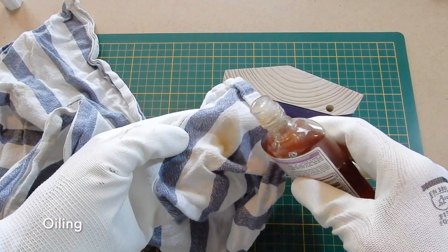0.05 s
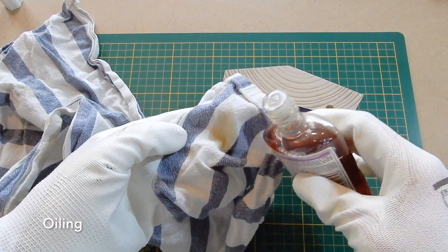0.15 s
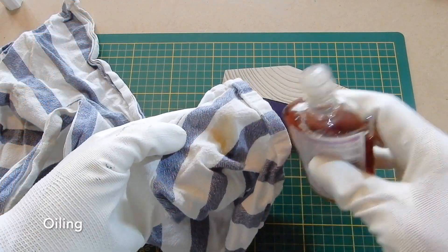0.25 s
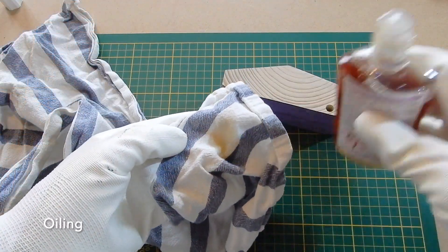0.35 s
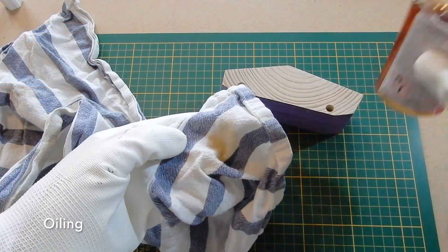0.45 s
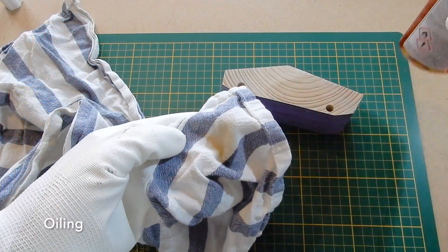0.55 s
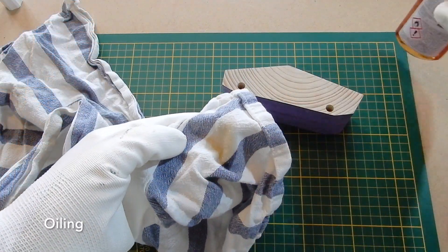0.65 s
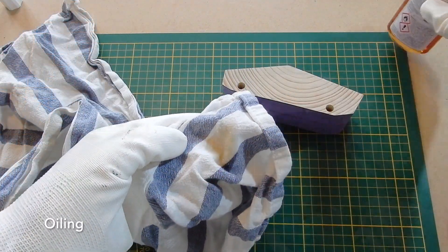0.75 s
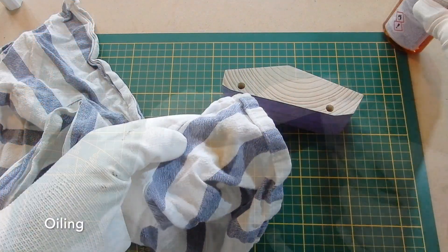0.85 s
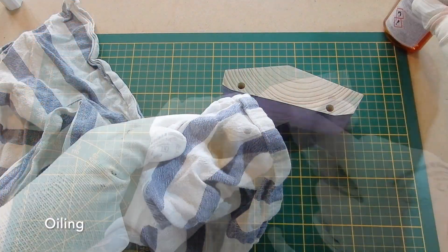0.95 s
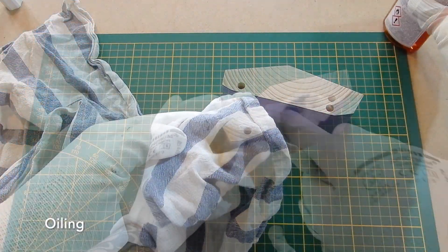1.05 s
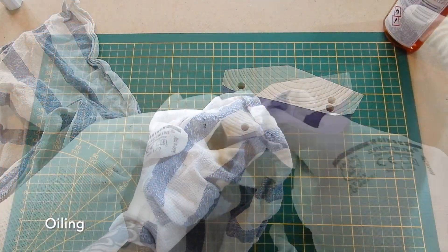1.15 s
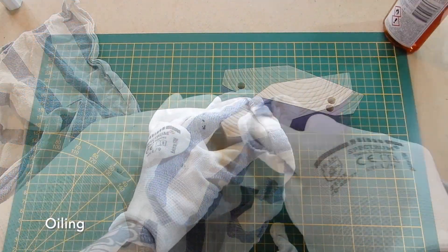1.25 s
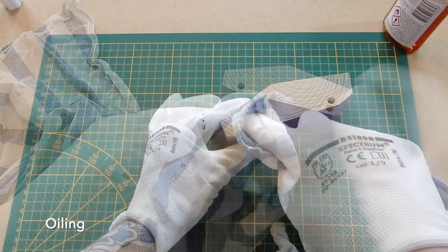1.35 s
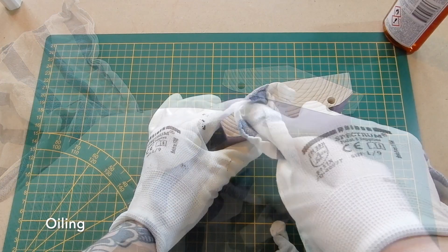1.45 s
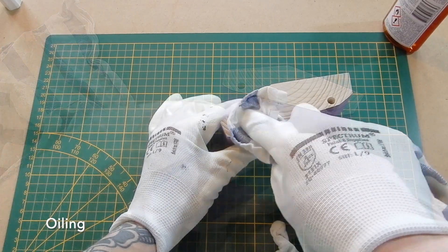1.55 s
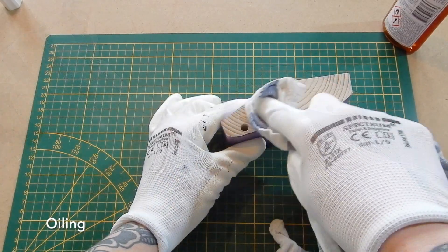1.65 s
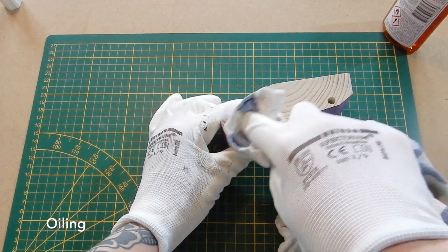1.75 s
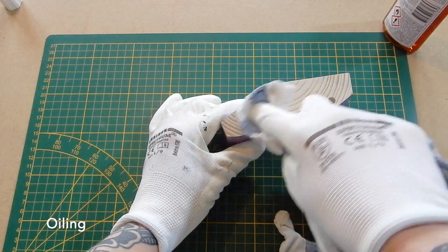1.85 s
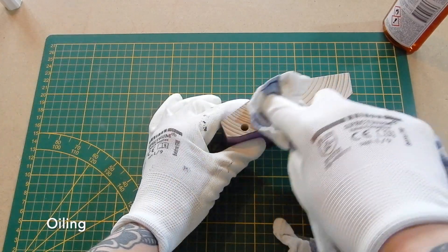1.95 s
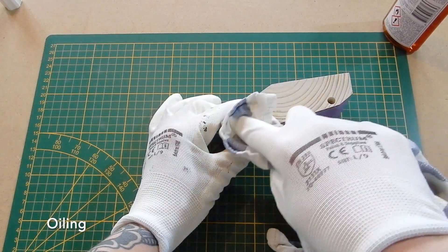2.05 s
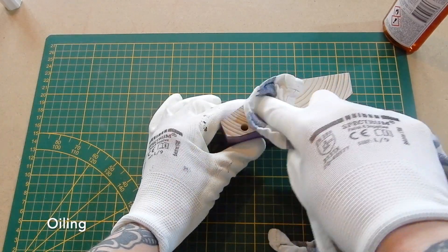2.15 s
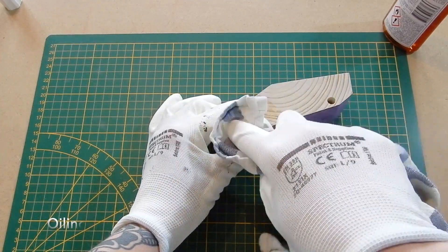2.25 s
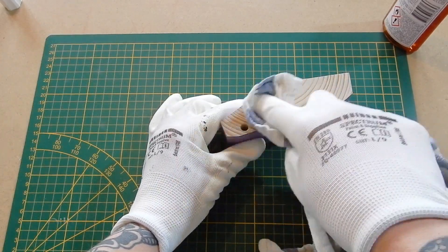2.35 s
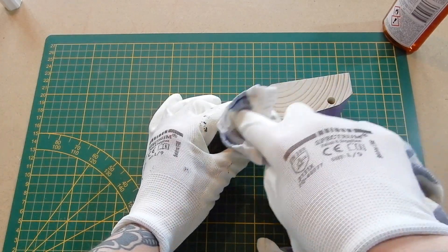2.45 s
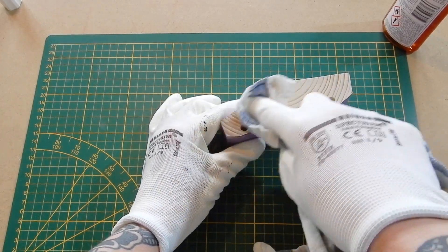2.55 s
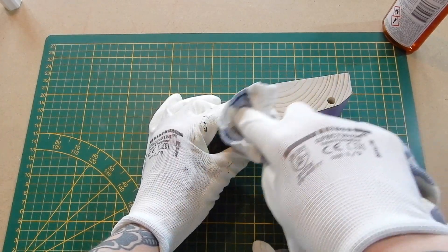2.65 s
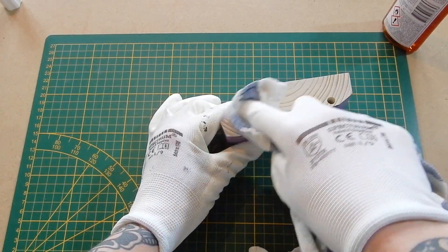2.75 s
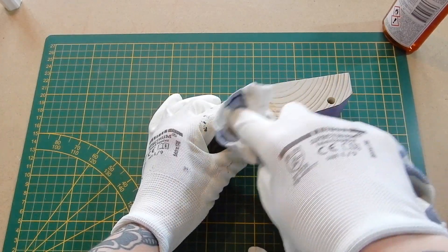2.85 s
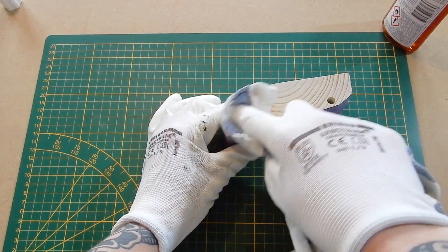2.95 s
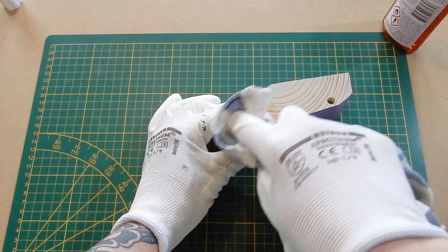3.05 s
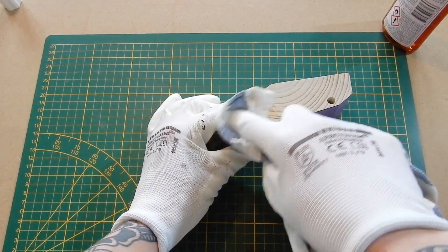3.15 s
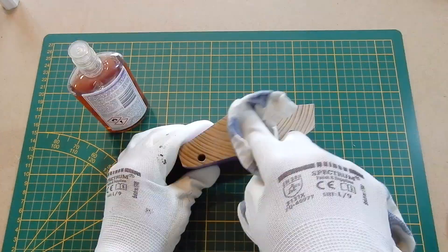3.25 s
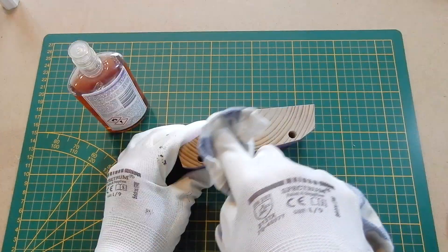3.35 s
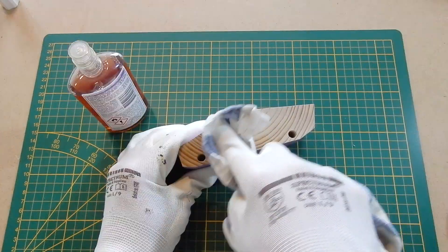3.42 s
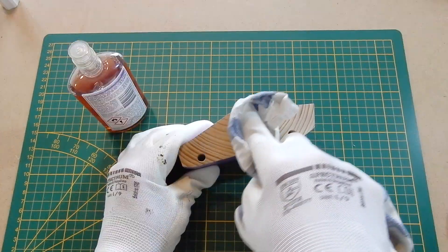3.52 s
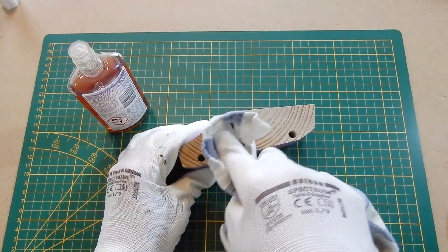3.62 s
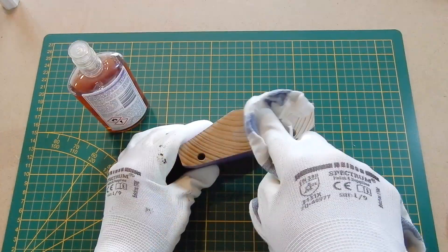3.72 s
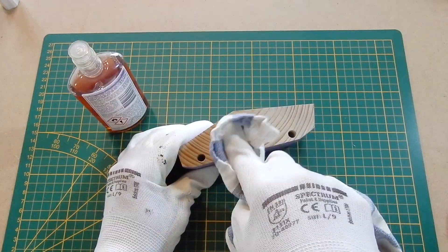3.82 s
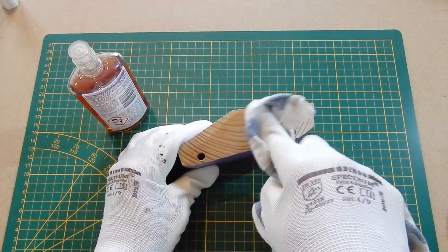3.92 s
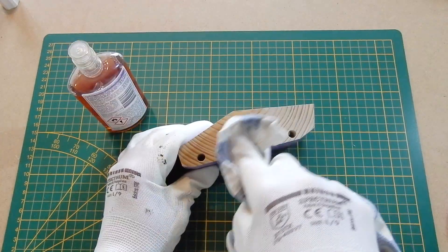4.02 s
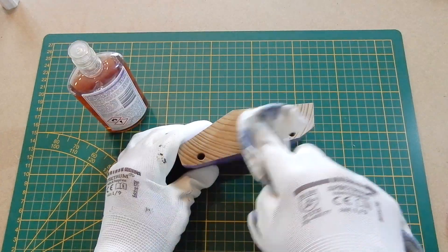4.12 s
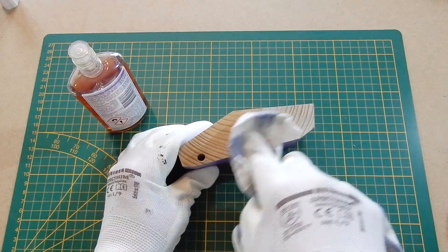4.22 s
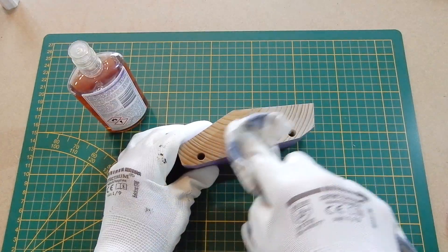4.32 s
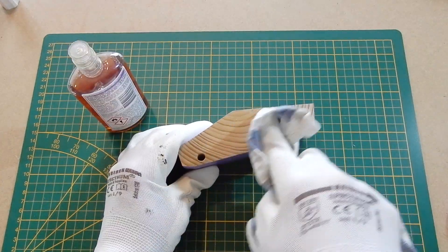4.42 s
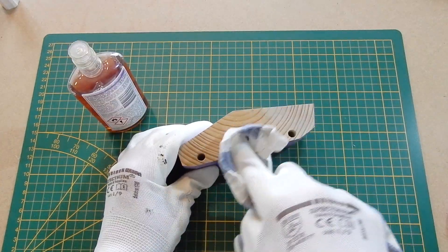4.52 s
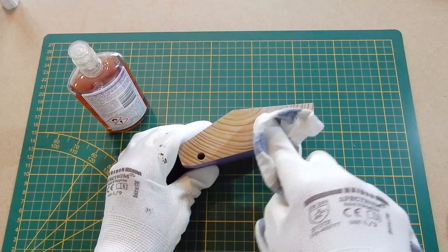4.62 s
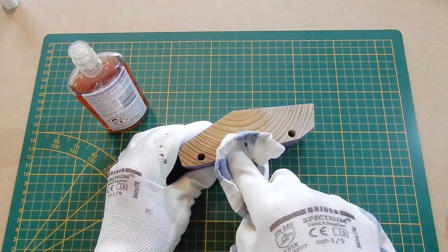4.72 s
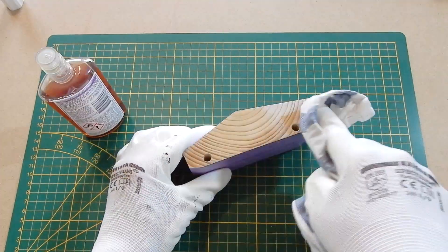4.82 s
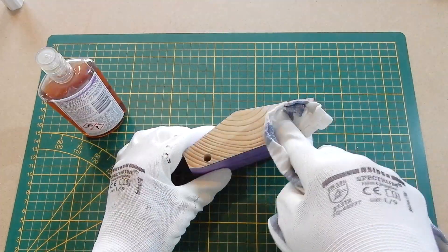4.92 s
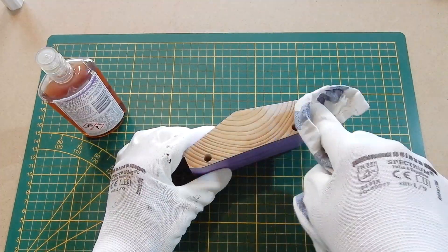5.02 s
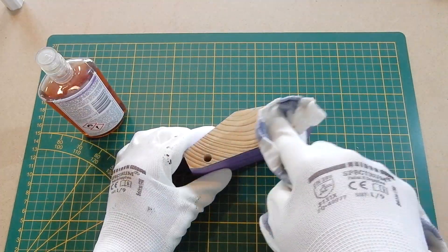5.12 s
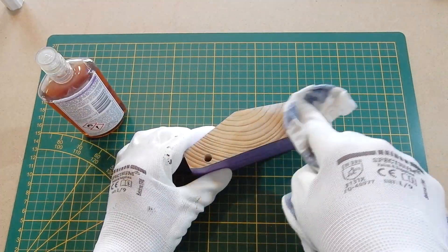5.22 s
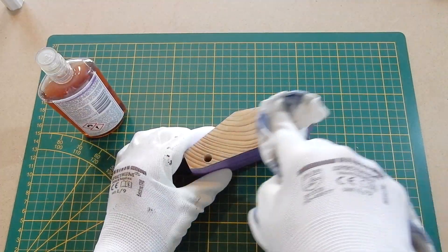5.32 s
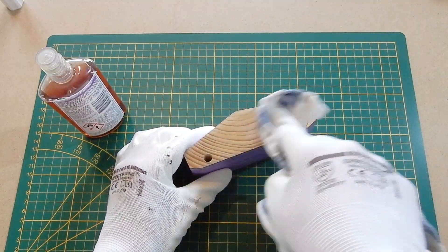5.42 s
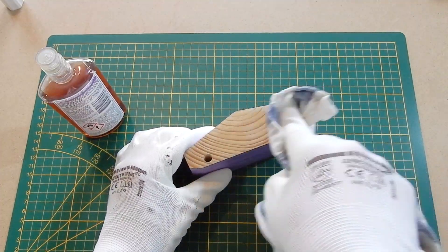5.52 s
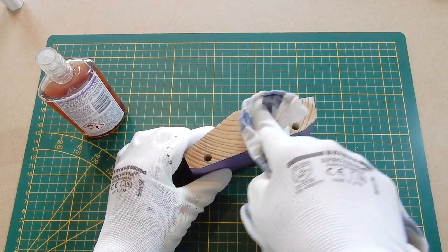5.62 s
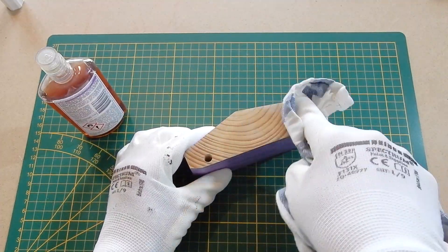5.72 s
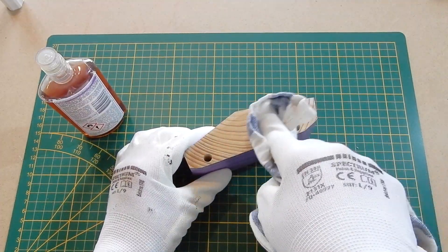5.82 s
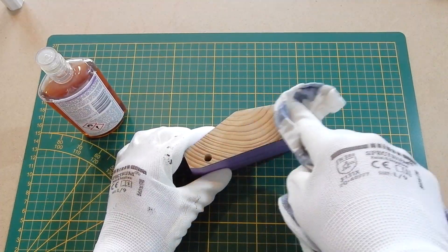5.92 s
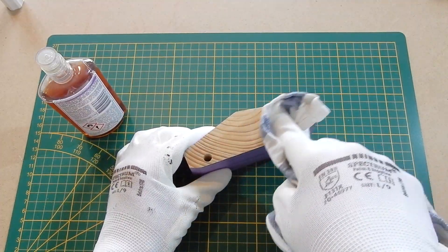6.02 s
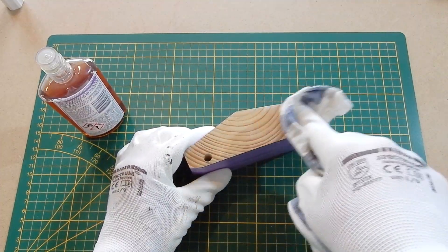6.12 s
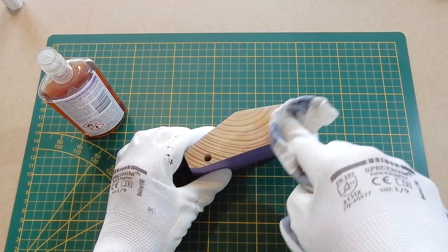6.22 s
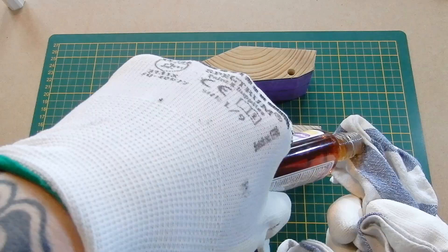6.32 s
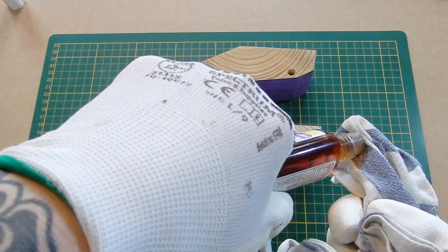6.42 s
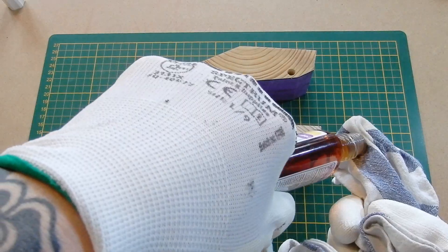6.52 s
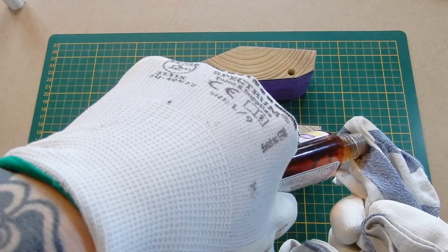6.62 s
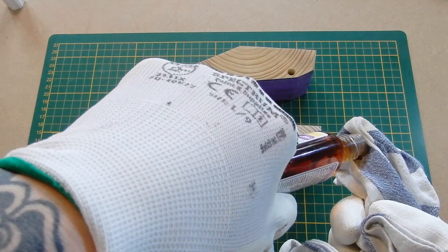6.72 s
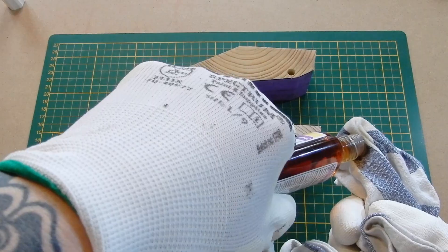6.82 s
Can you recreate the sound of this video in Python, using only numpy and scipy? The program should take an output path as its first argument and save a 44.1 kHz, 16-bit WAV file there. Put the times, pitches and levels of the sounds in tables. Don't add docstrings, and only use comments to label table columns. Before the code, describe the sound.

In a small room with a faint fan, soft glove rustling, one ringing bottle knock on a table, then rapid raspy cloth rubbing on wood.

```python
import sys
import numpy as np
from scipy import signal
from scipy.fft import rfft, irfft, next_fast_len
from scipy.io import wavfile
from scipy.ndimage import uniform_filter1d

SR = 44100
rng = np.random.default_rng(int(sys.argv[2]) if len(sys.argv) > 2 else 0)


def wav_out(sig):
    wavfile.write(sys.argv[1], SR, np.round(np.clip(np.atleast_2d(sig).T, -1, 1) * 32767).astype(np.int16))


def boost(x):
    u = np.asarray(x, float) / 20
    return 10 ** u


N = 303021
STEP = 64

# frequency in Hz, t60 in seconds.
ROOM_DECAY = [(100, 0.52), (1000, 1), (4000, 0.37), (8000, 0.25), (11000, 0.25), (15000, 0.37)]

# frequency in Hz, level in dB per Hz.
FAN_COLOUR = [(15, -48), (25, -13.5), (107, -7.5), (189, -5), (333, -10.5), (448, -9), (672, -15.5),
              (1200, -20.5), (1590, -19.5), (2200, -24), (4800, -26), (5400, -31.5), (9000, -40),
              (13700, -43), (14300, -57), (15500, -70)]
# centre in Hz, width in Hz, height in dB.
FAN_HUMPS = [(458, 25, 3), (1040, 60, 8), (1385, 55, 8), (1990, 55, 8), (2360, 57, 6), (2860, 65, 9),
             (3670, 76, 6), (4280, 100, 4), (4820, 110, 5), (5950, 90, 13)]
# frequency in Hz, likeness from 0 to 1.
FAN_LIKENESS = [(60, 0.6), (300, 0.55), (640, 0.18), (1400, 0.55), (3000, 0.38), (7000, 0.17),
                (15000, 0.053)]

# time in seconds, level in dB.
LEAN = [(0.0, -68.5), (0.3, -67.5), (0.9, -65), (1.3, -71), (1.68, -73), (1.9, -62.5), (2.4, -60.5),
        (3.1, -59), (3.7, -58.5), (4.4, -59), (5.2, -58), (5.9, -62), (6.37, -62.5), (6.45, -70),
        (6.87, -67.5)]
# peak in seconds, low part in dB, sharper part in dB.
SHOVES = [(0.076, -70, -72), (0.356, -69, -78), (0.532, -68, -69), (0.804, -75, -59), (0.92, -72, -85),
          (1.77, -75, -60), (2.14, -57, -77.5), (2.82, -59, -75), (3.2, -56, -62), (3.235, -55, -54),
          (4.02, -57, -68.5), (4.72, -71, -57), (5.24, -66, -57.5), (5.66, -62, -75), (5.82, -65, -79),
          (6.01, -56, -70), (6.38, -62, -75)]
# centre in Hz, width in Hz, level in dB.
BOARD = [(95, 35, -5.5), (142, 53, -3), (287, 122, -2), (420, 190, -16), (640, 250, -20)]
TABLE_SHELF = (108.74, 720)

# peak in seconds, rise in seconds, fall in seconds, level in dB,
# brightness in dB per octave.
SLIDES = [(0.0, .05, 0.056, -52.5, -4), (0.13, 0.1, .07, -59.5, 0), (.15, .2, .2, -64.5, 3),
          (0.235, 0.06, 0.023, -55.5, 1.5), (0.32, 0.1, 0.025, -62, -0.5), (0.42, 0.1172, 0.062, -70.5, 2),
          (0.57, 0.083, 0.1, -59.5, -2), (0.765, 0.093, 0.095, -61.5, -1.5), (1.1, 0.3348, 0.11, -68, 4),
          (1.255, 0.087, 0.041, -63.5, 2), (1.37, 0.1467, 0.11, -72.5, 6), (1.48, 0.035, 0.1034, -72, 2),
          (1.635, 0.021, 0.046, -69.5, 3), (1.742, 0.01306, 0.0166, -59, 1), (6.55, .015, .03, -79, 5),
          (6.675, .015, .03, -79, 4), (6.8, .015, 0.027, -79, 0)]
# frequency in Hz, level in dB per Hz.
FABRIC = [(880, -10), (1500, -7.5), (1690, -15), (1930, -3.5), (2520, -1), (4060, -1.5), (5340, -2.5),
          (9700, -10), (13000, -21), (15500, -24)]
# peak in seconds, half length in seconds, level in dB,
# centre in Hz.
SWISHES = [
    (.005, 0.053, -56.5, 2460),
    (0.185, .005, -54.5, 2900),
    (0.225, 0.027, -60, 5000),
    (0.333, 0.014, -66, 4800),
    (.58, 0.0412, -62, 6170),
    (1.24, 0.028, -68, 2980),
]
# time in seconds, level in dB.
TICKS = [
    (0.187, -58),
    (3.173, -40),
    (6.438, -60),
    (6.4612, -55),
    (6.5236, -70),
    (6.549, -64),
    (6.6757, -61),
    (6.8004, -62),
]
# start in seconds, level in dB, bubble pitch in Hz.
GLUGS = [
    (0.71, -41.5, 280),
    (0.74, -45.5, 262),
    (0.808, -46, 304),
    (0.83, -47, 220),
    (0.854, -43.5, 370),
]

# time in seconds, blow on the table in dB, ring of the bottle in dB.
CONTACTS = [(0.9415, -18.5, -53), (0.9484, -28, -49.5), (0.96, -29.5, -48), (.968, -25.5, -56),
            (0.973, -30, -48), (.9842, -31.5, -49.5), (.993, -31, -55.5), (1.004, -56, -55),
            (1.021, -34, -61), (1.039, -37, -66), (1.052, -54, -67), (1.077, -46, -76), (1.0881, -46, -72)]
# frequency in Hz, level in dB, t60 in seconds.
TABLE_MODES = [(98.21, -10, 0.174), (131, -1, 0.12), (160, -15, 0.24), (194, -11, 0.057), (275, -8.5, 0.15),
               (306.4, -1, 0.26), (330, -13, 0.13), (405, -16, 0.21), (458, -14, 0.16), (506, -13, 0.081),
               (555, -21, 0.14), (608, -17, 0.14), (674, -24, 0.21), (772, -17, 0.22), (859.88, -30, 0.18),
               (920, -24, 0.16), (945, -23, 0.15), (1050, -22, 0.13), (1160, -20, .2)]
# frequency in Hz, level in dB, t60 in seconds.
BOTTLE_MODES = [(2050, -5, 0.049), (2720, -14, 0.023), (3460, -13, 0.095), (3580, -3, 0.07),
                (3670, -5, 0.094), (3709, -9, 0.13), (3759.3, -20, 0.06), (4100, -16, 0.049),
                (4710, -3, 0.11), (5518, -17, 0.093), (6030, -3, 0.036), (7400, -7, 0.05),
                (8200, -11, 0.11), (8500, -12, 0.1)]
# frequency in Hz, level in dB.
THUD_COLOUR = [(60, -17), (130, 2), (200, -5), (300, 0), (500, 4), (800, -10), (1200, -7.5), (1500, -34),
               (2500, -24), (4000, -32)]
# time in seconds, level in dB, centre in Hz, t60 in seconds.
RIM_CRACKS = [
    (0.9428, -37.5, 3330, .02),
    (.9458, -38.5, 2080, 0.046),
]
# frequency in Hz, level in dB, t60 in seconds.
FRAME_MODE = (85, -33.5, 0.23)

# end in seconds, stroke rise in seconds, stroke fall in seconds, roundness in dB,
# room level in dB, share of the rise before the start.
BOUTS = [
    (3.338, 0.029, 0.021, 7, -7, .6),
    (4.873, .014, 0.015, 2.5, -10, 0.47),
    (6.402, .015, .018, 4.5, -12, 0.5),
]
# frequency in Hz, level in dB per Hz.
RUB_COLOURS = [
    [(530, -19), (900, -18), (1310, -20), (1420, -9.5), (1620, -15), (2320, -4), (4030, -3), (5770, -1.5),
     (9210, -7), (14300, -20), (15800, -21)],
    [(530, -22.5), (900, -24), (1580, -29), (1870, -16.5), (2380, -13), (2580, -8.5), (3880, -4),
     (4490, -0.5), (6500, 0.5), (14900, -10), (15800, -18)],
    [(530, -40), (900, -21), (1620, -28), (1990, -19), (3360, -12), (4330, -6.5), (8070, -2.5),
     (9320, -3.5), (11000, -11.5), (15100, -19.5), (15800, -18)],
]
# start in seconds, length in seconds, level in dB,
# hollow of the block in dB.
FIRST_STROKES = [(1.753, 0.064, -43.5, -1.5), (1.86, 0.071, -43, -8.5), (1.978, 0.075, -44.5, -6.5),
                 (2.097, 0.079, -42, -14), (2.231, 0.051, -43.5, -6), (2.331, 0.062, -44, -12),
                 (2.441, 0.067, -44, 3), (2.552, 0.058, -46, -9), (2.666, 0.052, -46, 1.5),
                 (2.762, 0.056, -47, -7), (2.878, 0.049, -47.5, 3.5), (2.968, 0.065, -48.5, -2.5),
                 (3.079, 0.054, -46.5, 3), (3.17, 0.075, -50.5, 2), (3.278, 0.048, -49.5, 6)]
# start in seconds, length in seconds, level in dB, hollow in dB.
SECOND_STROKES = [(3.355, 0.052, -46.5, 9.5), (3.451, 0.069, -47.5, 13.5), (3.569, 0.065, -46, 9),
                  (3.683, 0.069, -46, 8), (3.797, 0.073, -44, 6.5), (3.91, 0.06, -41, 3.5),
                  (4.021, 0.05, -41, 1.5), (4.122, 0.077, -41.5, 2), (4.236, 0.056, -40.5, 2),
                  (4.345, .07, -41, -1), (4.456, 0.064, -39, -1), (4.567, 0.073, -39.5, 0.5),
                  (4.685, 0.062, -39.5, -4), (4.795, 0.074, -41, 0)]
# start in seconds, length in seconds, level in dB, hollow in dB.
THIRD_STROKES = [(4.894, 0.062, -41.5, 7), (4.989, 0.08, -38.5, 2), (5.106, 0.056, -39, 2.5),
                 (5.205, 0.075, -38, -0.5), (5.321, 0.06, -40, 2), (5.43, 0.08, -38.5, 2.5),
                 (5.551, 0.064, -42, 2), (5.664, 0.071, -40, 2), (5.787, 0.08, -43.5, -2.5),
                 (5.903, 0.078, -42.5, 3), (6.026, 0.05, -41.5, -1), (6.131, 0.053, -45, 8.5),
                 (6.233, 0.053, -43, 5), (6.324, 0.065, -44.5, 4)]
# swell over the stroke in dB,
# brightness in dB per octave.
DIRECTIONS = [
    [(-0.5, 0), (0, 1.14)],
    [(-7, 1), (-6, -0.5)],
    [(-8, -0.1), (-7, 1)],
]
PRESSURE_TILT = [-0.051, -0.36, -0.079]
# level in dB, brightness in dB per octave.
DRAGS = [
    (-61.5, -4),
    (-63, -7.5),
    (-60.5, -8),
]
# brightness in dB per octave,
# fine fizz in dB, low skirt in dB.
STROKE_QUIRKS = [
    [(-1.7, 0.5, -2), (0, -0.5, -1), (0.5, 0.9, 0.5), (1.5, -6, 0.5), (-1, 0, 0.5), (-1.3, 1, 4),
     (1.9, 2.5, 2.5), (-0.3, -1, 2.1), (0.5, 1, 1), (0.8, 2, 5), (-0.7, 8, 1), (0.7, 6, 7), (-1.5, 7, 0.5),
     (-0.5, 6, -2.0), (2.5, 6, 7)],
    [(2.5, -5, 5), (5.2, -4.5, 9), (2, -1, 7), (3, -5, 9), (2.2, -3, 8.5), (2, -1, 3), (0.5, 0.5, -2),
     (1.4, -2, 4.7), (0.8, 0, 0), (-0.5, -0.7, 0.5), (0.4, -1.5, 0.5), (-0.8, -1.5, -1), (-3.2, 1, -5.5),
     (0, -2, -2)],
    [(2.5, 1, 5), (-2.4, 5, 1.8), (1, 3, 2), (1.0, -0.8, 4), (1.2, 1.2, 2.5), (1.1, -0.5, 3), (1, -3, -3.3),
     (1, -2.5, 1), (-3.5, 1, -2), (0.3, -2, 3), (-0.9, 1, 1.2), (3, -2, 3), (3.5, -2, 4), (1.5, 0, 6)],
]

# peak in seconds, level in dB, board mode in Hz.
BUMPS = [(2.167, -50, 158.5), (2.293, -58, 140), (2.385, -52, 194), (2.401, -53.5, 303),
         (2.458, -50.5, 175), (2.506, -58, 150.6), (2.547, -55, 172), (2.586, -53, 146),
         (2.696, -54.5, 141), (2.729, -55, 182.9), (2.792, -47, 155), (2.903, -54.4, 145),
         (2.943, -50.5, 187), (3.005, -56.1, 113), (3.014, -56, 301), (3.041, -53.5, 151),
         (3.096, -58, 151), (3.203, -55.3, 398), (3.206, -50.5, 188), (3.216, -51, 275), (3.263, -60, 280),
         (3.316, -57, 161), (3.364, -55.5, 108), (3.421, -56.4, 81), (3.588, -58, 86), (3.809, -56, 86),
         (3.891, -57, 102), (3.927, -52.4, 145), (3.975, -56.4, 320), (3.977, -54, 145), (4.037, -52, 86),
         (4.252, -48.5, 81), (4.309, -54, 109), (4.376, -54, 145), (4.474, -51, 75), (4.548, -54, 151),
         (4.707, -55, 81), (4.753, -53.2, 109), (4.843, -57, 169), (4.893, -60, 161), (4.911, -54.7, 86),
         (5.017, -50, 150), (5.074, -55.2, 149), (5.114, -50, 151), (5.159, -51.5, 181), (5.223, -48, 166),
         (5.24, -58, 267), (5.484, -51, 145), (5.567, -53, 92), (5.656, -58, 156), (5.735, -56, 253),
         (5.804, -48.5, 81), (5.915, -53.5, 169), (6.003, -55.7, 123), (6.245, -54, 156), (6.354, -55, 212)]
# centre in Hz, width in Hz, depth in dB.
PORT_DIP = (1506, 520, -4)


def evened(x):
    return x / np.sqrt(np.mean(x ** 2) + 1e-20)


def read(points, hz):
    f, value = np.transpose(points)
    return np.interp(np.log(hz + 1), np.log(f + 1), value)


def add(mix, s, sound):
    part = mix[..., round(s * SR):][..., :sound.shape[-1]]
    part += sound[..., :part.shape[-1]]


def coloured(x, gain):
    size = next_fast_len(x.shape[-1])
    spectrum = rfft(x, size) * gain(np.fft.rfftfreq(size, 1 / SR))
    return irfft(spectrum, size)[..., :x.shape[-1]]


def band(hz, centre_hz, spread_oct2):
    return np.exp(-np.log2(hz / centre_hz + 1e-9) ** 2 / spread_oct2)


def blotches(shape, bins, frames):
    across = uniform_filter1d(rng.standard_normal(shape), size=bins, axis=0)
    return evened(uniform_filter1d(across, size=frames, axis=1))


def swell(peak_s, rise_s, fall_s):
    t = np.arange(0, N + STEP, STEP) / SR - peak_s
    return np.exp(-(t / np.where(t < 0, rise_s, fall_s)) ** 2)


def spread(control):
    return np.interp(np.arange(N), np.arange(len(control)) * STEP, control)


def slips(count, per_s, spread_db):
    size = boost(spread_db * np.minimum(rng.exponential(1, count), 4))
    return evened(size * rng.standard_normal(count) * (rng.random(count) < per_s / SR))


def ring(modes, length):
    t = np.arange(int(length * SR)) / SR
    return sum(boost(db - 60 * t / t60) * np.sin(2 * np.pi * hz * t) for hz, db, t60 in modes)


def through_table(x):
    low_hz, high_hz = TABLE_SHELF

    def left_gain(hz):
        lead_rad = 0.49 / (1 + (hz / 600) ** 2)
        return (low_hz + 1j * hz) / (high_hz + 1j * hz) * np.exp(1j * lead_rad)
    return np.array([coloured(x, left_gain), x])


def room(x):
    hz, t, z = signal.stft(rng.standard_normal((2, SR // 2)), SR, nperseg=256)
    decay = boost(-60 * t / read(ROOM_DECAY, hz)[:, None])
    tail = signal.istft(z * decay, SR, nperseg=256)[1]
    tail[1] = 0.56 * tail[0] + 0.59 * tail[1]
    tail[:, :200] = 0
    return signal.fftconvolve(x[None], tail / np.linalg.norm(tail[0]), axes=1)[:, :N]


def fan():
    a, b = rng.standard_normal((2, N))
    same = lambda hz: np.clip(read(FAN_LIKENESS, hz), 0, 1)
    right = coloured(a, same) + coloured(b, lambda hz: np.sqrt(1 - same(hz) ** 2))

    def colour(hz):
        humps = 1 + sum((boost(db) - 1) / (1 + (2 * (hz - f) / w) ** 2) for f, w, db in FAN_HUMPS)
        return boost(read(FAN_COLOUR, hz)) * humps
    return boost(-59.5) * evened(coloured(np.array([a, right]), colour))


def pushes():
    def board(part):
        def humps(hz):
            resonances = sum(boost(db) / (1 + 2j * (hz - f) / w) for f, w, db in part)
            return 1j * hz / (60 + 1j * hz) * resonances
        shared = slips(N, 700, 1.5)
        loose = np.array([slips(N, 500, 2.6), slips(N, 500, 2.0)])
        return evened(coloured(through_table(shared) + 0.64 * loose * boost([[-4], [3]]), humps))

    low = boost(np.interp(np.arange(0, N + STEP, STEP) / SR, *np.transpose(LEAN)))
    sharp = low * boost(-0.5)
    for s, low_db, sharp_db in SHOVES:
        bell = swell(s, 0.05, 0.052)
        low = np.hypot(low, boost(low_db) * bell)
        sharp = np.hypot(sharp, boost(sharp_db) * bell)
    return spread(low) * board(BOARD[:2]) + spread(sharp) * board(BOARD[2:])


def rustle():
    grains = slips(N, 9000, 2.2) + 0.59 * rng.standard_normal((2, N))
    fabric = evened(coloured(grains, lambda hz: boost(read(FABRIC, hz))))
    hz, t, z = signal.stft(fabric, SR, nperseg=256)
    slides = np.array([boost(db) * swell(s, rise, fall) for s, rise, fall, db, _ in SLIDES])
    level = np.sqrt((slides ** 2).sum(0))
    bright = np.array(SLIDES)[:, 4] @ slides ** 2 / (level ** 2 + 1e-20)
    frame_bright = spread(bright)[np.minimum((t * SR).astype(int), N - 1)]
    tilt_db = frame_bright * np.log2(hz / 4500 + 0.15)[:, None]
    folds_db = 1.1 * blotches(z.shape[1:], 7, 11)
    return signal.istft(z * boost(tilt_db + folds_db), SR, nperseg=256)[1][:, :N] * spread(level)


def swishes():
    out = np.zeros(N)
    for s, half_s, db, centre_hz in SWISHES:
        squeak = evened(coloured(slips(N, 9000, 1.5), lambda hz: band(hz, centre_hz, 0.051)))
        out += boost(db) * spread(swell(s, half_s, half_s)) * squeak
    return out


def fibre_ticks():
    ticks, t = np.zeros(N), np.arange(200) / SR
    for s, db in TICKS:
        add(ticks, s, boost(db - 0.5 - 60 * t / .003) * rng.standard_normal(200))
    return coloured(ticks, lambda hz: band(hz, 8000, 2.4))


def oil_glugs():
    glugs, t = np.zeros(N), np.arange(1500) / SR
    for s, db, hz in GLUGS:
        bubble = np.sin(2 * np.pi * hz * t * (1 + 3 * t))
        add(glugs, s, boost(db - 60 * t / 0.1) * bubble * np.minimum(t / 0.0021, 1))
    return through_table(glugs)


def knock():
    table, bottle, t = np.zeros(N), np.zeros(N), np.arange(8000) / SR
    dull = lambda hz: (hz / 2000) ** 2 / (1 + (hz / 2000) ** 2) / (1 + (hz / 8000) ** 5)
    for s, blow_db, ring_db in CONTACTS:
        wall = ring(BOTTLE_MODES + rng.standard_normal((len(BOTTLE_MODES), 1)) * [12, 1.8, 0], .3)
        thud = evened(coloured(rng.standard_normal(len(t)), lambda hz: boost(read(THUD_COLOUR, hz))))
        add(table, s, -boost(blow_db) * ring(TABLE_MODES, .5))
        add(table, s, boost(blow_db - 4.5 - 60 * t / 0.19) * thud * np.minimum(t / 0.0029, 1))
        chatter = rng.standard_normal(len(t)) * boost(-60 * t / 0.073) * np.minimum(t / 0.00077, 1)
        strike = np.r_[1, .12 * chatter[:200]]
        add(bottle, s, boost(ring_db) * signal.oaconvolve(strike, wall))
        add(bottle, s, boost(ring_db + 10) * coloured(chatter, dull))
    for s, db, centre_hz, t60 in RIM_CRACKS:
        rim = coloured(rng.standard_normal(len(t)), lambda hz: band(hz, centre_hz, .5))
        add(bottle, s, boost(db - 60 * t / t60) * evened(rim))
    frame = ring([FRAME_MODE], .3)
    add(table, 1.078, frame * np.minimum(np.arange(len(frame)) / 700, 1))
    table = signal.oaconvolve(table, np.hanning(48) / 24)[:N]
    table = signal.sosfilt(signal.butter(2, 75, "high", fs=SR, output="sos"), table)
    return through_table(table) + bottle + boost(-12) * room(bottle + 0.13 * table)


def stroke(row, bout, colour):
    s, length, level_db, swell_db, bright_db, hollow_db, fizz_db, skirt_db = row
    _, rise, fall, round_db, _, early = bout
    t = np.arange(-rise, length + fall, 1 / SR)
    gate = np.clip(np.minimum((t + early * rise) / rise, (length + 0.58 * fall - t) / fall), 0, 1)
    speed_db = 0.76 * swell_db * (t / length - .5) - round_db * ((2 * t / length - 1) ** 2 - .4)

    fibres, apart = slips(len(t), 30000, 0.4), rng.standard_normal((2, len(t)))
    pair = fibres + boost(-6.5) * coloured(apart, lambda hz: np.clip(hz / 13000, 0, 1) ** 3 + 0.15)
    hz, frame_s, z = signal.stft(pair, SR, nperseg=128)
    grain = blotches(z.shape[1:], 3, 25)
    clumps = blotches(z.shape[1:], 9, 5)
    ragged = 1 + 1.57 / (1 + (hz / 2500) ** 4)[:, None]
    slow_db = np.interp(frame_s - rise, t, speed_db + 20 * np.log10(gate + 0.23))
    dulling_db = 0.26 * slow_db * np.log2(hz / 6500 + 0.096)[:, None]
    z = z * boost(grain * ragged + 1.55 * clumps + dulling_db)
    pair = signal.istft(z, SR, nperseg=128)[1][:, :len(t)]

    def gain(hz):
        tilt_db = bright_db * np.log2(hz / 6500 + 0.077)
        block_db = hollow_db * band(hz, 2400, 0.73)
        top_db = fizz_db / (1 + (10500 / (hz + 1)) ** 8)
        low_db = 1.56 * skirt_db / (1 + (hz / 2000) ** 8)
        return boost(read(colour, hz) + tilt_db + block_db + top_db + low_db)
    envelope = np.sin(gate * np.pi / 2) ** 2 * boost(level_db + speed_db)
    return s - rise, evened(coloured(pair, gain)) * envelope


def drag(start_s, end_s, colour, db, bright_db):
    t = np.arange(0, end_s - start_s + .05, 1 / SR)
    fibres = slips(len(t), 22000, 2.1) + 0.62 * rng.standard_normal((2, len(t)))
    gain = lambda hz: boost(read(colour, hz) + bright_db * np.log2(hz / 6500 + 0.09))
    return start_s, boost(db) * evened(coloured(fibres, gain)) * np.minimum(t / 0.011, 1)


def rubbing():
    out, t = np.zeros((2, N)), np.arange(N) / SR
    strokes = (FIRST_STROKES, SECOND_STROKES, THIRD_STROKES)
    bouts = zip(strokes, BOUTS, RUB_COLOURS, DIRECTIONS, PRESSURE_TILT, DRAGS, STROKE_QUIRKS)
    for rows, bout, colour, ways, press, light, quirks in bouts:
        end_s, room_db = bout[0], bout[4]
        close = np.zeros((2, N))
        for k, (s, length, db, hollow_db) in enumerate(rows):
            swell_db, bright_db = ways[k % 2]
            own_bright_db, fizz_db, skirt_db = quirks[k]
            bright_db += own_bright_db + press * (db + 45)
            row = (s, length, db, swell_db, bright_db, hollow_db, fizz_db, skirt_db)
            add(close, *stroke(row, bout, colour))
        wet = close + boost(room_db) * room(close[0])
        add(wet, *drag(rows[0][0], end_s, colour, *light))
        out += boost([[-.2], [.2]]) * wet * np.clip((end_s - t) / 0.033 + .5, 0, 1)
    return out


def bumps():
    out, t = np.zeros(N), np.arange(-.06, .1, 1 / SR)
    bell = np.exp(-(t / np.where(t < 0, .012, 0.017)) ** 2)
    for (s, db, hz), turn in zip(BUMPS, rng.random((len(BUMPS), 1))):
        add(out, s - .06, boost(db + 5.5) * bell * np.sin(2 * np.pi * (hz * t + turn)))
    return through_table(out)


def scene():
    handling = fan() + pushes() + rustle() + swishes() + fibre_ticks()
    return handling + oil_glugs() + knock() + rubbing() + bumps()


def top_cut(x):
    return signal.sosfilt(signal.butter(12, 15830, fs=SR, output="sos"), x)


def record(dry):
    centre_hz, width_hz, depth_db = PORT_DIP

    def microphone(hz):
        dip = boost(depth_db * np.exp(-(2 * (hz - centre_hz) / width_hz) ** 2))
        return dip * np.clip((15830 - hz) / 60, 0, 1)
    mix = coloured(dry, microphone)
    return top_cut(mix)


dry = scene()
out = record(dry)
wav_out(out)
```